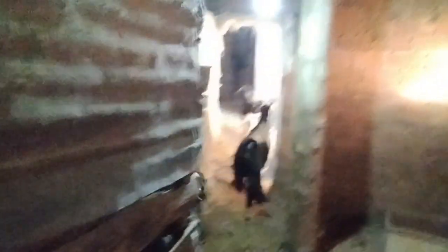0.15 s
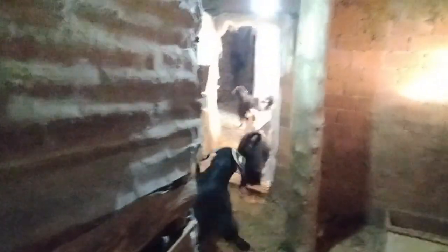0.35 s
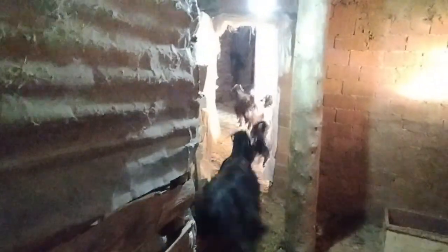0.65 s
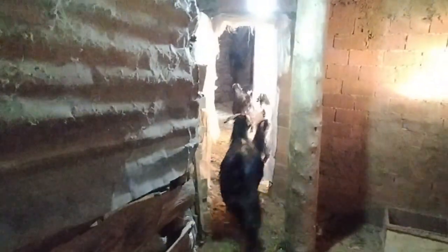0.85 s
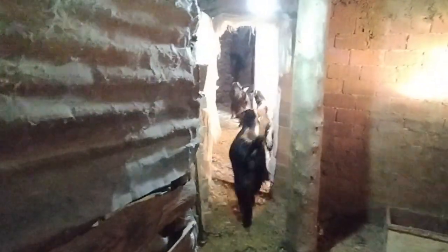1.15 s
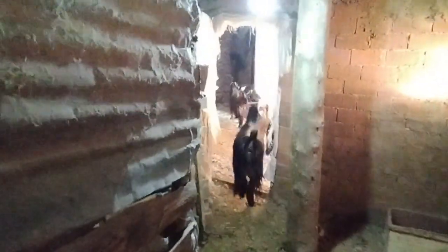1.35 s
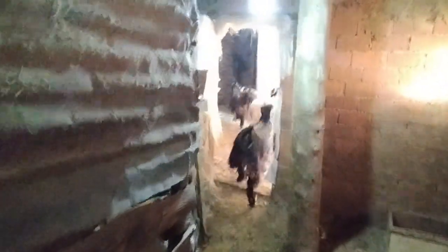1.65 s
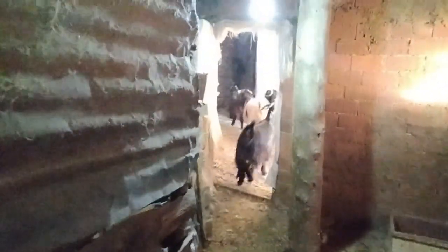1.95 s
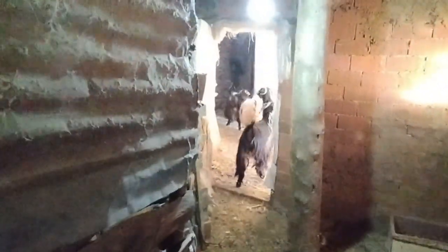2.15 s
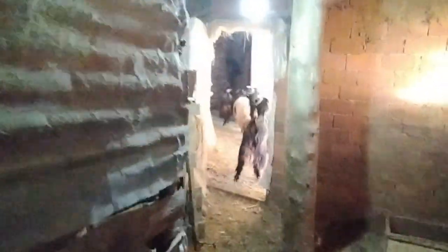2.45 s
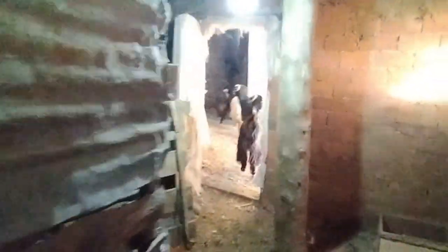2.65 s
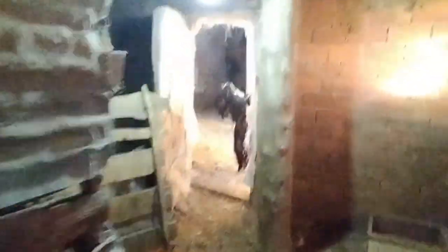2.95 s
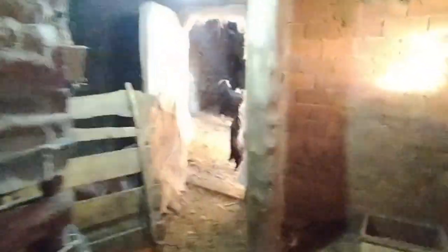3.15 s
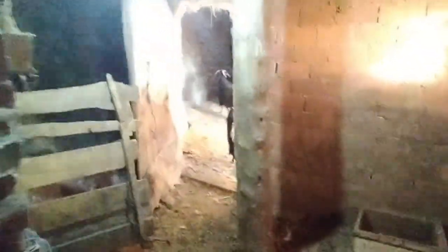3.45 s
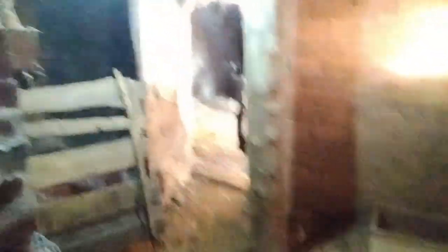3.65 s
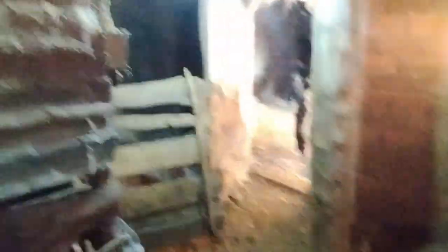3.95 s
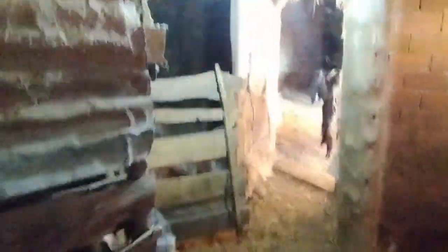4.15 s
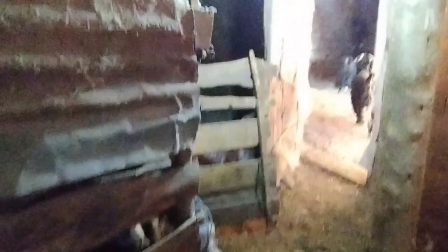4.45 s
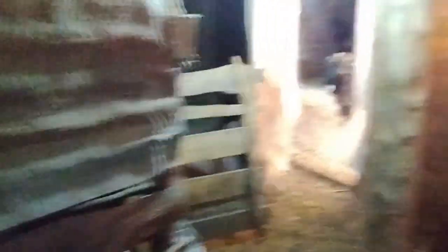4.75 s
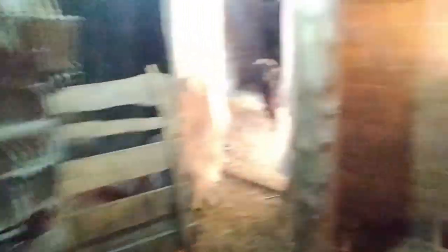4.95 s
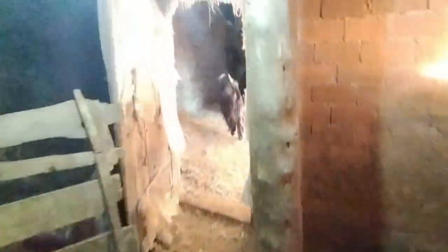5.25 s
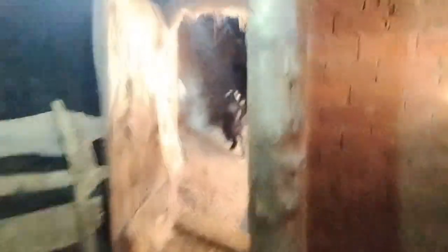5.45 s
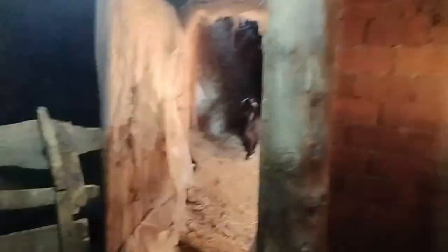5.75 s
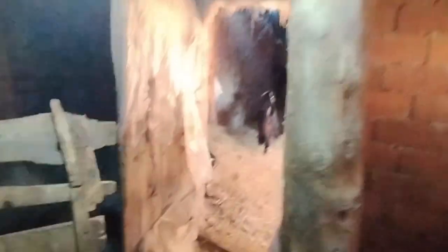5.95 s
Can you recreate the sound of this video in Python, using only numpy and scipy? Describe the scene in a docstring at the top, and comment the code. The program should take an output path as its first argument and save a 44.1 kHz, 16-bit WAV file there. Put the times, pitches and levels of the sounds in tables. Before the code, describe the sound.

A goat squeezes past a corrugated iron partition, making a loud rasping clatter with hollow thumps and a low ring. Hooves scuff and tap through straw, and the iron is bumped again more softly, a loose edge chattering. One goat gives a short, quiet grunt. Then a person takes a few gritty steps on dirt, with light knocks. The small barn adds a short reverberation, over faint hiss and rumble.

```python
"""A goat squeezes past a corrugated iron partition in a small brick barn. Stick-slip friction makes the
sheet rasp; it clacks, buckles and booms on in its bending modes. Hooves tap and straw rustles as the herd
moves off through a doorway, and just after one second the iron is struck again and a loose edge chatters.
Near three seconds one goat grunts softly, glottal pulses and breath resonating in its throat. Then a
person follows, with a few gritty steps on the dirt floor. A faint hiss and rumble lie under it all."""
import sys
import numpy as np
from scipy import signal
from scipy.fft import rfft, irfft
from scipy.io import wavfile
from scipy.ndimage import uniform_filter1d

SR = 44100
rng = np.random.default_rng(int(sys.argv[2]) if len(sys.argv) > 2 else 0)


def unload_audio(sound):
    """Save the sound as a 16-bit wav file, at the path given as the first command line argument."""
    columns = np.transpose(np.atleast_2d(sound))
    # keep every value between -1 and 1, then stretch to whole-number steps
    steps = np.round(np.clip(columns, -1, 1) * 32767)
    wavfile.write(sys.argv[1], SR, steps.astype(np.int16))


N = 269451
TIME, HZ = np.arange(N) / SR, np.fft.rfftfreq(8192, 1 / SR)
LAG_S = 0.000488  # sound from the left reaches the left channel this much sooner

# Spectrum of rubbed iron. Each row: frequency in Hz, level in dB.
RASP_SPECTRUM = [(30, -16.5), (150, -1.5), (350, 5.5), (550, -2), (850, 3), (1150, -4.5), (2000, -6),
                 (2800, -4.5), (3500, -7), (4300, -4.5), (5200, -10), (7000, -9.5), (8700, -21.5),
                 (10500, -39.5), (16000, -36)]
# Spectrum of rustling straw. Each row: frequency in Hz, level in dB.
STRAW_SPECTRUM = [(100, -6), (500, 1), (1400, 1), (2100, -0.5), (3200, -0.5), (4500, -3), (6300, -1.5),
                  (8500, -12.5), (10500, -30), (16000, -25.5)]


def amp(db):
    """Decibels as an amplitude ratio."""
    return np.exp(np.asarray(db) * np.log(10) / 20)


def unit_rms(x):
    """Normalisation to unit mean power."""
    return x / np.sqrt(np.mean(x ** 2) + 1e-20)


def wander(length, span):
    """A moving average over span samples turns white noise into a slow fluctuation."""
    return unit_rms(uniform_filter1d(rng.standard_normal(length), size=span))


def curve(points, hz=HZ):
    """Interpolation along logarithmic frequency."""
    f, value = np.transpose(points)
    return np.interp(np.log(hz + 1), np.log(f + 1), value)


def add(mix, s, sound):
    """Superposition: a sound joins the mix at s seconds."""
    part = mix[..., max(round(s * SR), 0):][..., :sound.shape[-1]]
    part += sound[..., :part.shape[-1]]


def convolve(x, response):
    """Convolution with an impulse response, cut to the length of x."""
    return signal.fftconvolve(np.atleast_2d(x), np.atleast_2d(response), axes=1)[:, :x.shape[-1]]


def colour(x, db):
    """A minimum-phase filter with the gain db over HZ."""
    log_gain = np.log(amp(np.maximum(np.r_[db, db[-2:0:-1]], -100)))
    response = np.fft.ifft(np.exp(np.conj(signal.hilbert(log_gain)))).real
    return convolve(x, response[:len(HZ)])


def stereo(pair, lag=0., direct=0.):
    """Spatial coherence: two noises become alike in the bass, and in the treble by their direct share."""
    hz = np.fft.rfftfreq(pair.shape[1], 1 / SR)
    left, other = rfft(pair)
    coherence = direct * np.exp(-2j * np.pi * hz * lag) + (1 - direct) * np.sinc(2 * hz * LAG_S)
    right = coherence * left + np.sqrt(np.maximum(1 - abs(coherence) ** 2, 0)) * other
    return irfft(np.array([left, right]), pair.shape[1])


def grains(length, per_s, spread_db):
    """Shot noise: tiny slips and snaps of uneven size at random moments."""
    size = amp(spread_db * np.minimum(rng.exponential(1, length), 4))
    return unit_rms(rng.standard_normal((2, length)) * size * (rng.random(length) < per_s / SR))


def damped(x, decays):
    """Frequency-dependent damping: each band falls 60 dB in its own time, its T60."""
    hz, t, bands = signal.stft(x, SR, nperseg=512)
    bands = bands * amp(-60 * t / curve(decays, hz)[:, None])
    return signal.istft(bands, SR, nperseg=512)[1][:, :x.shape[1]]


def stroke(s, rise, fall, size=SR // 2):
    """Start time and envelope of a Gaussian swell that peaks at s and decays exponentially."""
    start = max(s - 2.5 * rise, 0)
    t = start + TIME[:size] - s
    return start, np.exp(-np.minimum(np.where(t < 0, (t / rise) ** 2, t / fall), 20))


def mode(hz, t60):
    """Free vibration of a damped oscillator."""
    t = TIME[:SR // 5]
    return np.exp(-np.log(1000) * t / t60) * np.sin(2 * np.pi * hz * t)


def thump(ring, rise_s):
    """A soft contact builds its vibration gradually; the peak is scaled to 1."""
    ring = ring * (1 - np.exp(-TIME[:len(ring)] / rise_s))
    return ring / abs(ring).max()


def air(waver_db=1.56, flutter_db=3, rumble_hz=130):
    """Random amplitude modulation makes a thin hiss waver and the rumble beneath it flutter."""
    # Background spectrum. Each row: frequency in Hz, level in dB.
    spectrum = [(20, 1.5), (40, 2), (100, -8.5), (200, -11.5), (400, -13.5), (800, -17.5), (1400, -19.5),
                (1750, -18.5), (1950, -15.5), (2250, -20.5), (4500, -22), (6700, -20), (8500, -29.5),
                (10500, -45), (16000, -39.5)]
    # Its level over time. Each row: time in seconds, level in dB.
    levels = [(0, -65), (2.4, -63), (4.3, -56), (5.1, -61)]
    noise = unit_rms(colour(stereo(rng.standard_normal((2, N)), direct=0.1), curve(spectrum)))
    waver, flutter = wander(N, 6000), wander(N, 6000)
    rumble = signal.sosfiltfilt(signal.butter(2, rumble_hz, fs=SR, output="sos"), noise)
    noise = noise - rumble + rumble * unit_rms(amp(flutter_db * flutter))
    return noise * amp(np.interp(TIME, *np.transpose(levels)) + waver_db * waver)


def iron_response(modes_db=-15, crash_db=7, crash_s=0.061, split=0.0175, glide=0.0209, glide_s=0.0802):
    """A plate's impulse response sums its modes: a short crash, a crowd of weak ones, a few strong."""
    # The strongest modes. Each row: frequency in Hz, relative level in dB, T60 in seconds.
    modes = [(24.86, 10, 2.63), (43.3, 4.5, 2.8), (68.2, -8, 1.2), (78, -1.5, 1.16), (92.6, -7, 1.86),
             (116.3, -6, 2.2), (132.8, -9.5, 2.1), (190.6, 1, 0.49), (219.4, -8.5, 2), (276.7, -1.5, 0.84),
             (309.2, -2, 0.7), (347, -11, 1.9), (396, -3.5, 1.44), (646, -15, 3.7), (702, -10, 2.6),
             (764, 3, 0.9), (851, 0.5, 1.1), (1344, 11, 0.34), (2920, -2, 0.56), (4270, 2, 0.12)]
    # Damping of the weaker modes. Each row: frequency in Hz, T60 in seconds.
    decays = [(30, 8.4), (120, 3), (300, 0.59), (500, 1.62), (800, 1.16), (1300, 0.77), (2800, 0.27),
              (4500, 0.19), (9000, 0.022)]
    t = TIME[:2 * SR]
    crowd = damped(stereo(rng.standard_normal((2, len(t))), LAG_S, direct=0.29), decays)
    bent_time = t + glide * glide_s * (1 - np.exp(-t / glide_s))  # a freshly bent sheet rings sharp
    tones = 0
    for hz, db, t60 in modes:
        # overlapping panels ring at slightly different pitches, so each mode beats
        panel_hz = hz * (1 + split * (np.arange(-1, 2) + rng.uniform(-.5, .5, 3)))
        ring = np.sin(2 * np.pi * panel_hz[:, None] * bent_time).sum(0) / np.sqrt(3)
        tones = tones + amp(db - 60 * t / t60) * ring
    tones = np.array([tones, np.interp(t - LAG_S / 2, t, tones)])
    crash, fade = amp(crash_db) * np.exp(-t / crash_s), np.cos(np.pi * t / 4)
    return crowd * (1 + crash) + amp(modes_db) * tones * fade


def partition(ring_db=-4, clump_db=3.0, push_cycles=0.34):
    """Stick-slip friction from the goat's flank, and blows, force the iron's modes into vibration."""
    # The flank shoves along the iron. Each row: time of the peak in seconds, level in dB.
    shoves = [(0.002, -31), (0.086, -29.5), (0.193, -34.5), (.5, -53.5), (.75, -57), (0.899, -57),
              (1.23, -46.5)]
    # Blows on the iron. Each row: start in seconds, level in dB, centre in Hz of the band that the
    # struck spot favours, its spread in octaves.
    blows = [(0.004, -32.5, 119, 0.55), (0.082, -27, 40, 1.4), (0.103, -26, 257, 0.68),
             (0.183, -39, 2870, 0.06), (0.233, -27, 105, 0.86), (.269, -34.5, 4520, 0.058),
             (.275, -37, 990, .3), (.35, -40, 796, 0.23), (.85, -50.5, 285, 0.082), (1.229, -59, 678, 0.14),
             (1.27, -45.5, 300, 0.077), (1.282, -45.5, 1260, 0.7), (1.289, -43, 131, 0.66),
             (1.316, -35.5, 98, 0.48), (1.315, -36, 298, 0.07), (1.32, -30.5, 25.7, 0.72),
             (1.379, -42, 135, 0.31), (1.465, -46, 292, 0.086), (1.58, -45.5, 117.8, 0.14),
             (2.04, -50.5, 117.6, 0.082)]
    response, pressure = iron_response(), np.zeros(N)
    for s, db in shoves:
        start, shove = stroke(s, rise=0.0075, fall=0.12)
        add(pressure, start, amp(db) * shove)
    clumps = np.tanh(wander(N, 500))
    slips = stereo(grains(N, per_s=3000, spread_db=1.0), LAG_S, direct=0.25)
    rasp = unit_rms(colour(slips, curve(RASP_SPECTRUM))) * pressure * amp(clump_db * clumps)
    out = rasp + amp(ring_db) * convolve(rasp[0], response / np.linalg.norm(response[0]))
    for s, db, hz, octaves in blows:
        away = np.log2((HZ + 1) / hz) / octaves
        ring = colour(response, -15 * np.log10(1 + away ** 2 / 2) - 12 * np.log10(1 + (HZ / hz / 3) ** 2))
        # a soft body takes part of a cycle to set the sheet going
        ring = ring * np.minimum(TIME[:ring.shape[1]] * hz / push_cycles, 1)
        add(out, s, amp(db) * ring / np.std(ring[:, :SR // 20]))
    return out


def squeaks():
    """Hair and straw stick and slip almost periodically, giving narrow-band noise with a rough pitch."""
    # Each row: time of the peak in seconds, level in dB, rise and fall in seconds, pitch and
    # half-width in Hz.
    rubs = [(0.006, -27, 0.014, 0.035, 4240, 290), (.084, -35, 0.0038, .022, 4230, 200),
            (0.169, -34.5, 0.0057, 0.034, 4240, 190), (.287, -31, 0.0088, 0.015, 4540, 220),
            (1.764, -53, 0.011, 0.006, 2140, 240.7), (3.8, -50.5, 0.036, 0.03, 2090, 220),
            (3.792, -51, 0.016, .022, 5470, 373)]
    out = np.zeros((2, N))
    for s, db, rise, fall, hz, width in rubs:
        start, swell = stroke(s, rise, fall)
        slips = stereo(rng.standard_normal((2, len(swell))))
        band_db = -20 * np.log10(1 + ((HZ - hz) / width) ** 2)
        add(out, start, amp(db) * swell * unit_rms(colour(slips, band_db)))
    return out


def clacks(rise_s=0.000397):
    """Overlapping panels collide: a brief metal impact excites a broad band, stifled at once."""
    # Each row: time in seconds, level in dB, decay in seconds, centre in Hz, spread in octaves.
    impacts = [(.019, -29, 0.0049, 1200, 0.47), (.08, -29, 0.0065, 3650, 0.36),
               (0.13, -31, 0.0056, 6000, 0.38), (0.1843, -22, 0.0032, 2940, .4),
               (0.2692, -28.5, 0.0045, 3320, 0.87), (.3455, -31.5, 0.0062, 2830, .2)]
    out = np.zeros((2, N))
    for s, db, fall, hz, octaves in impacts:
        start, hit = stroke(s, rise_s, fall)
        band_db = curve(RASP_SPECTRUM) - 20 * np.log10(1 + (np.log2((HZ + 1) / hz) / octaves) ** 2)
        noise = stereo(rng.standard_normal((2, len(hit))))
        add(out, start, amp(db) * hit * unit_rms(colour(noise, band_db)))
    return out


def buckles():
    """Buckling: the sheet gives way with a hollow thump, damped by the body that leans on it."""
    # Each row: start in seconds, peak in dB, frequency in Hz, T60 in seconds.
    snaps = [(0.079, -17, 172, 0.044), (.105, -18.5, 260, 0.037), (.127, -20.5, 187, 0.13),
             (.196, -25, 220, 0.059), (0.235, -26, 106, .06), (1.315, -25.5, 122, 0.2)]
    out = np.zeros((2, N))
    for s, db, hz, t60 in snaps:
        add(out, s, amp(db) * thump(mode(hz, t60), rise_s=0.0013))
    return out


def rustle(s, db, rise, fall, tilt_db_per_octave, clump_db=1.6):
    """Fine snaps in hair or straw merge into a swell of shot noise, bunched in gritty clumps."""
    start, swell = stroke(s, rise, fall)
    snaps = stereo(grains(len(swell), per_s=7000, spread_db=1.5), LAG_S, direct=0.094)
    snaps = snaps * amp(clump_db * wander(len(swell), 160))
    spectrum_db = curve(STRAW_SPECTRUM) + tilt_db_per_octave * np.log2(HZ / 3000 + 0.13)
    return start, amp(db) * swell * unit_rms(colour(snaps, spectrum_db))


def rustles(pan_db=1):
    """Friction on fibres, a little to the right: quick scuffs sound bright, slow brushes softer."""
    # Hooves scuff through straw. Each row: time of the peak in seconds, level in dB, decay in seconds.
    scuffs = [(.474, -38.5, 0.036), (0.621, -42.5, 0.044), (0.707, -46, 0.015), (0.848, -46, 0.02),
              (1.184, -52.5, 0.019), (1.231, -52, 0.019), (2.047, -58, 0.0067), (2.081, -57, 0.0046),
              (2.348, -54, 0.009), (3.589, -59, 0.011)]
    # Coats and clothes brush by. Each row: time of the peak in seconds, level in dB, length in seconds.
    brushes = [(0.135, -31, 0.057), (0.374, -34, 0.047), (0.852, -60, 0.14), (1.309, -47, 0.058),
               (1.457, -51.5, 0.059), (1.512, -48.5, 0.068), (1.553, -49, 0.013), (1.695, -57.5, 0.039),
               (1.758, -59, 0.05), (1.837, -56, 0.035), (1.886, -47.5, 0.041), (3.001, -62.5, 0.25),
               (3.483, -65.5, 0.2), (3.604, -49, 0.028), (3.647, -49.5, 0.081), (3.789, -49.5, 0.1),
               (4.496, -53.5, 0.09), (4.931, -59.5, 0.026), (5.109, -64, .04), (5.368, -51, 0.045),
               (5.446, -62, 0.2), (5.879, -62.5, .06)]
    out = np.zeros((2, N))
    for s, db, fall in scuffs:
        add(out, *rustle(s, db, .28 * fall, fall, tilt_db_per_octave=5))
    for s, db, length in brushes:
        add(out, *rustle(s, db, .53 * length, .47 * length, tilt_db_per_octave=1))
    return out * amp([[-pan_db], [pan_db]])


def crunch(s, db, rise, fall, dull_hz, hollow_db=4.0, grit_db=-17):
    """Brittle fracture: clods break underfoot in many dull impulses while grit hisses."""
    # Spectrum of crushed dirt. Each row: frequency in Hz, level in dB.
    dirt = [(30, -31), (90, -13), (170, -8.5), (270, -0.5), (400, -6), (600, -9), (900, -8.5), (1500, -11),
            (2300, -9.5), (3200, -36), (8000, -45)]
    start, press = stroke(s, rise, fall, size=SR // 3)
    clods = stereo(grains(len(press), per_s=3500, spread_db=-2.0), direct=0.57)
    spot_db = hollow_db * wander(len(HZ), 24)  # each spot has its own resonances
    body = unit_rms(colour(clods, curve(dirt) + spot_db - 10 * np.log10(1 + (HZ / dull_hz) ** 4)))
    grit = stereo(grains(len(press), per_s=6000, spread_db=4.0))
    grit = unit_rms(colour(grit, curve(STRAW_SPECTRUM)))
    return start, amp(db) * press * (body + amp(grit_db) * grit)


def knocks(crunch_db=-11.5):
    """A hard impact excites one heavily damped mode and crushes a little dirt."""
    # Hooves, heels, breaking clods and loose boards. Each row: start in seconds, level in dB,
    # frequency in Hz, T60 in seconds.
    impacts = [(1.133, -35.5, 179.5, 0.18), (1.594, -45, 870, 0.027), (1.615, -46, 480, 0.034),
               (1.639, -47.5, 2000, 0.017), (2.08, -46, 1470, 0.0034), (2.228, -40, 2060, 0.01),
               (2.711, -46.5, 310, 0.019), (3.63, -37, 154, 0.096), (3.952, -25, 620, 0.01),
               (4.172, -43, 1080, 0.0021), (4.192, -44.5, 280, 0.068), (4.4146, -31.5, 890, 0.0066),
               (4.699, -41.5, 396, .007), (6.051, -31, 402, 0.0098), (6.0652, -31.5, 760, 0.011)]
    out = np.zeros((2, N))
    for s, db, hz, t60 in impacts:
        add(out, s, amp(db) * mode(hz, t60))
        add(out, *crunch(s, db + crunch_db, rise=0.000581, fall=0.0084, dull_hz=hz))
    return out


def chatter(s=1.229, gap_s=0.036, restitution=0.83, db=-39, hz=673, detune=0.035, bounces=4):
    """Inelastic bouncing: a loose edge of the sheet strikes ever sooner, on nearly the same note."""
    out = np.zeros((2, N))
    for bounce, chance in enumerate(rng.standard_normal(bounces)):
        add(out, s, amp(db) * mode(hz * (1 + detune * chance), t60=0.083))
        s += gap_s * restitution ** bounce
    return out


def steps(toe_db=1, overtone_db=-5, weight_db=-19):
    """Each footfall excites damped floor modes and crunches from sole to toe; dragging adds friction."""
    # Each row: landing in seconds, crunch level in dB, the thump's peak in dB, frequency in Hz, T60 and
    # rise in seconds, then sole-to-toe roll in seconds and the crunch's cutoff in Hz.
    footfalls = [(3.63, -37, -34.5, 290, .045, 0.0027, .021, 850),
                 (3.933, -34, -31.5, 345, .045, .0018, .017, 755),
                 (4.4144, -48, -29.5, 266.6, 0.096, 0.00017, 0.0019, 910),
                 (5.3595, -41.5, -26.5, 292, 0.029, 0.00081, .013, 680),
                 (6.057, -35.5, -31.5, 430, 0.024, 0.0011, .008, 1600)]
    # Heels scrape, feet drag and resettle. Each row: time of the peak in seconds, level in dB, decay
    # in seconds, cutoff in Hz.
    shuffles = [(2.862, -50, 0.04, 1090), (2.965, -55.5, 0.068, 905), (3.602, -41, .017, 420),
                (3.675, -47.5, .026, 1300), (3.909, -43, 0.024, 650), (4.48, -49.5, 0.049, 876),
                (5.333, -47.5, .012, 550), (5.437, -54.5, .018, 1100), (5.52, -55, 0.032, 700),
                (6.045, -46, .008, 2200)]
    out = np.zeros((2, N))
    for s, db, thump_db, hz, t60, rise, roll, dull_hz in footfalls:
        for delay, part_db in (0, 0), (roll, toe_db):
            add(out, *crunch(s + delay, db + part_db, rise=.0055, fall=0.019, dull_hz=dull_hz))
        overtone = amp(overtone_db) * mode(hz * 1.67, t60=0.019)
        weight = amp(weight_db) * mode(hz=169, t60=0.093)  # the body's weight settles
        add(out, s, amp(thump_db) * thump(mode(hz, t60) + overtone + weight, rise))
    for s, db, fall, dull_hz in shuffles:
        add(out, *crunch(s, db, .6 * fall, fall, dull_hz))
    return out


def grunt(s=3.112, db=-46.5, pitch_hz=177.7, sag_hz_per_s=151, jitter=0.024, breath=0.58):
    """Source and filter: uneven, sagging glottal pulses and hiss pass a goat's nearly closed throat."""
    # Throat resonances. Each row: centre in Hz, width in Hz, level in dB.
    formants = [(120, 76, 3.5), (360, 85, -5.5), (520, 140, -5.5), (680, 120, -8), (1590, 300, -17.5)]
    start, effort = stroke(s, rise=0.025, fall=0.044)
    hz = pitch_hz - sag_hz_per_s * (start + TIME[:len(effort)] - s)
    hz = hz * (1 + jitter * wander(len(effort), 250))
    pulses = unit_rms(np.diff(np.floor(np.cumsum(hz) / SR), prepend=0))
    source = (1 - breath) * pulses + breath * rng.standard_normal(len(effort))
    throat = sum(amp(level) / (1 + ((HZ - centre) * 2 / width) ** 2) for centre, width, level in formants)
    out = np.zeros((2, N))
    add(out, start, amp(db) * effort * unit_rms(colour(source, 20 * np.log10(throat))))
    return out


def barn(x, delay_s=.006):
    """Reverberation: reflections from the brick walls merge into a short diffuse tail."""
    # Reverberation time. Each row: frequency in Hz, T60 in seconds.
    decays = [(100, 0.63), (500, 0.13), (2000, 0.47), (8000, 0.21)]
    tail = damped(stereo(rng.standard_normal((2, SR // 2))), decays) * (TIME[:SR // 2] > delay_s)
    return convolve(x, tail / np.linalg.norm(tail[0]))


def scene(iron_wet_db=-14, floor_wet_db=-17):
    """Direct sound from iron, animals and feet superposes with its reverberation and the background."""
    iron = partition() + buckles() + clacks() + chatter()
    floor = rustles() + squeaks() + steps() + knocks() + grunt()
    return iron + floor + barn(amp(iron_wet_db) * iron + amp(floor_wet_db) * floor) + air()


def record(dry, cutoff_hz=15900):
    """Linear filtering makes the right channel brighter than the left, then limits the bandwidth."""
    # Channel balance. Each row: frequency in Hz, right minus left in dB.
    balance = [(100, -1.5), (600, 0), (1300, 2), (2400, 4.5), (4500, 5), (8000, 4), (13000, 0)]
    tilt_db = curve(balance) / 2
    heard = np.vstack([colour(dry[0], -tilt_db), colour(dry[1], tilt_db)])
    lowpass = signal.firwin(511, cutoff_hz, window=("kaiser", 9), fs=SR)
    return signal.oaconvolve(heard, lowpass[None], "same")


dry = scene()
out = record(dry)
unload_audio(out)
```